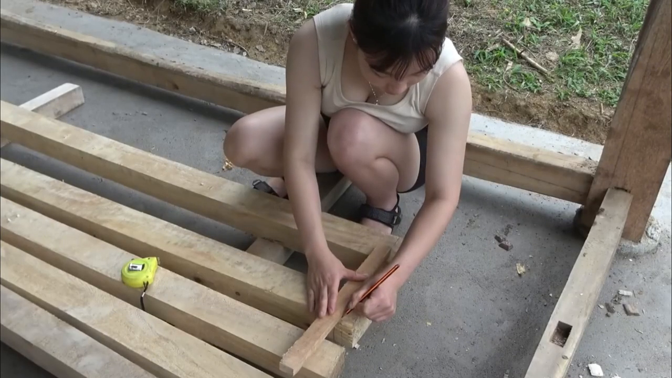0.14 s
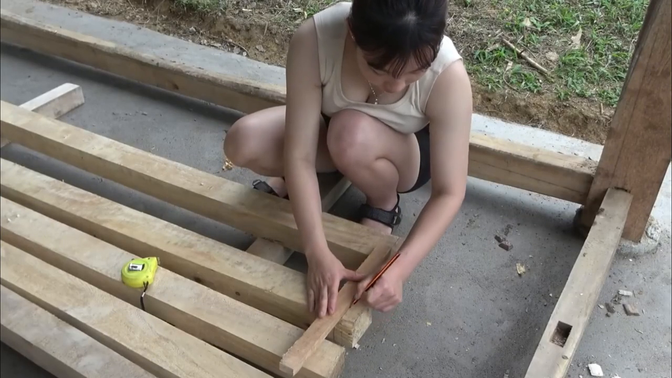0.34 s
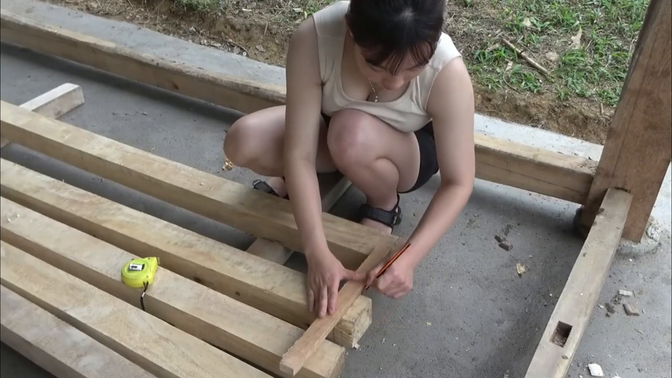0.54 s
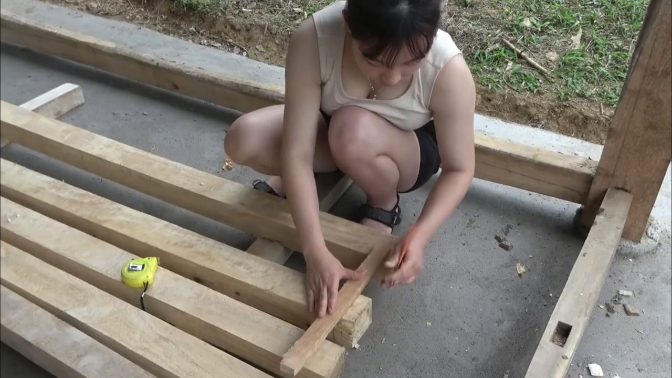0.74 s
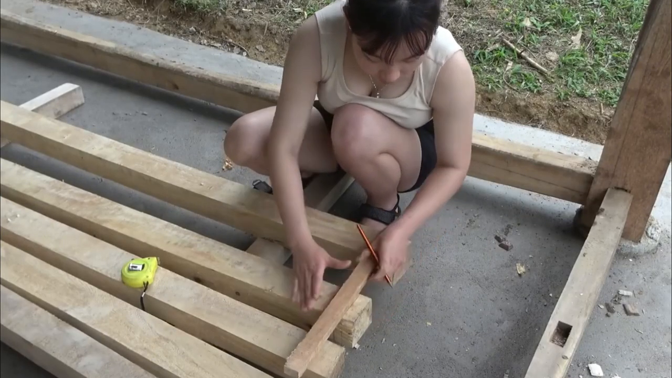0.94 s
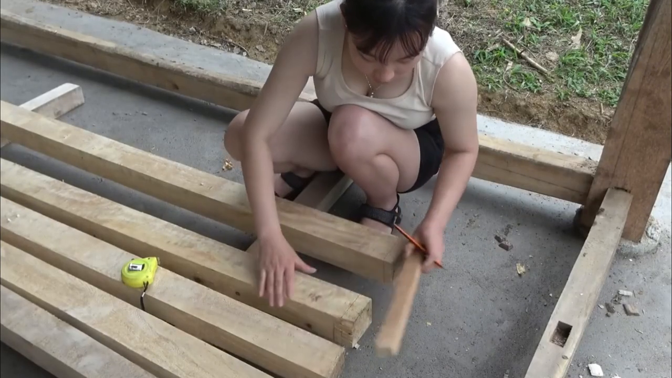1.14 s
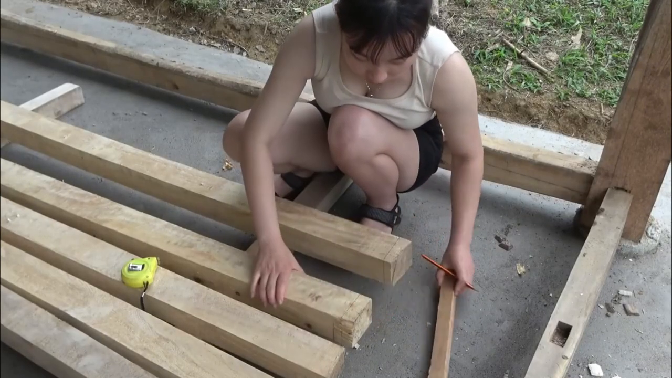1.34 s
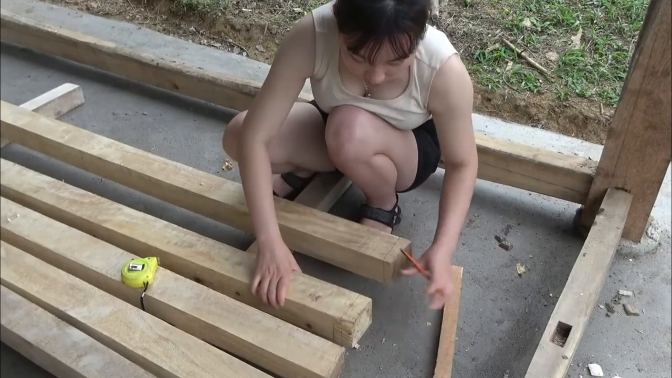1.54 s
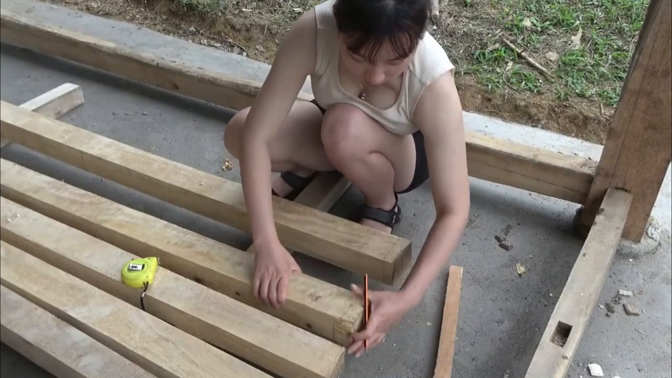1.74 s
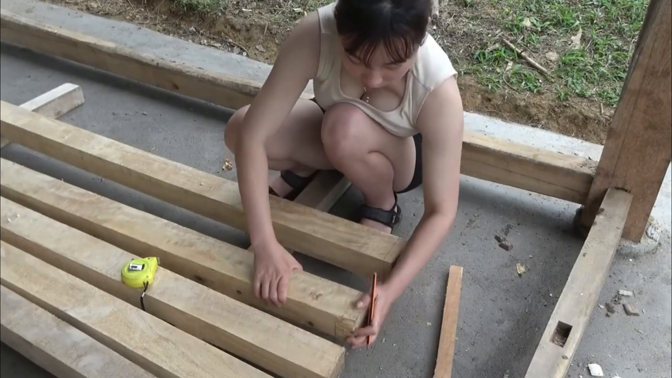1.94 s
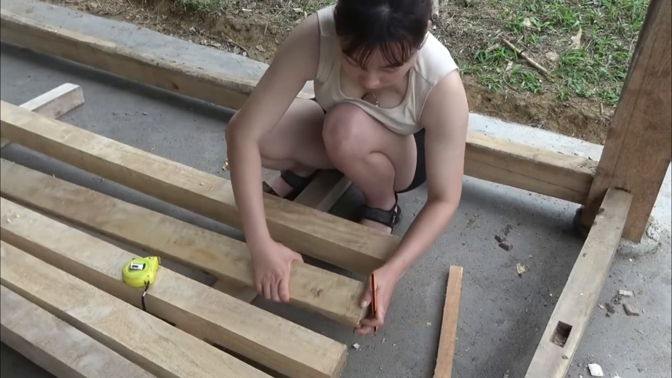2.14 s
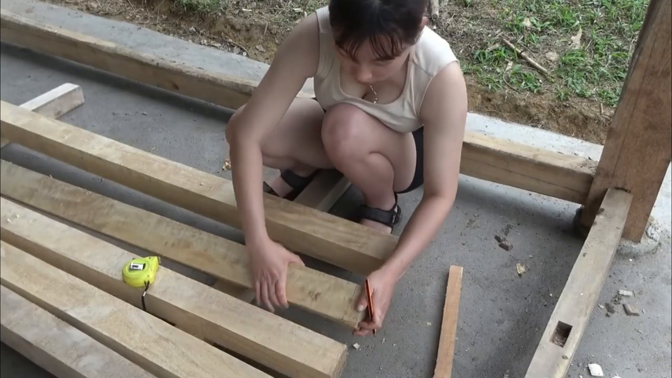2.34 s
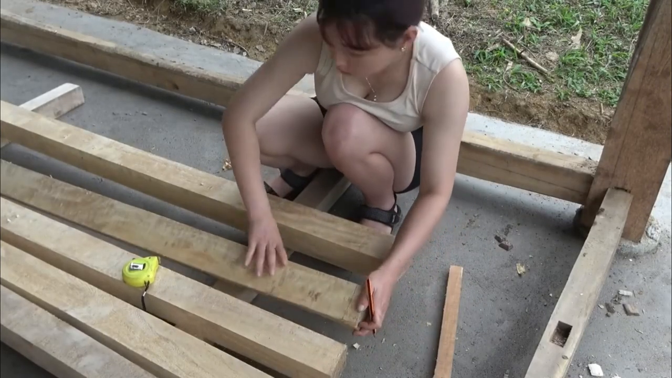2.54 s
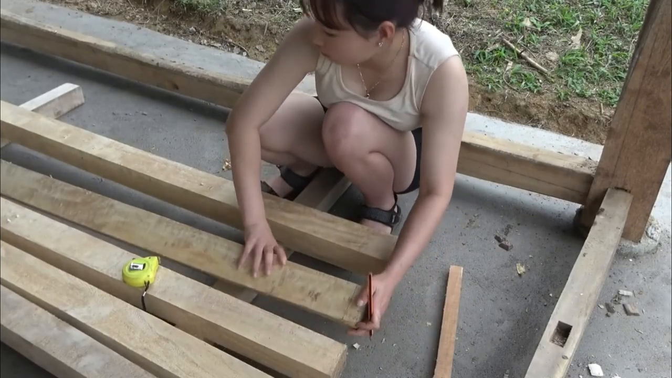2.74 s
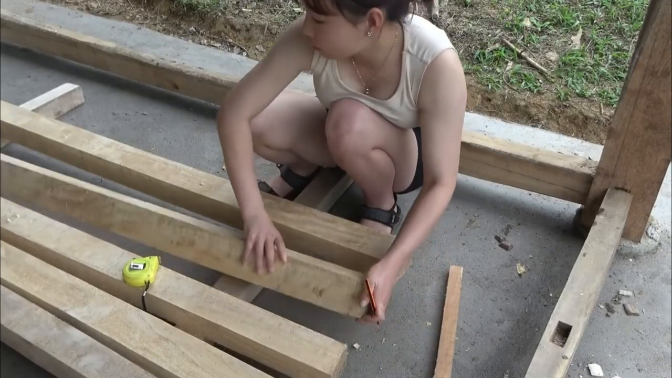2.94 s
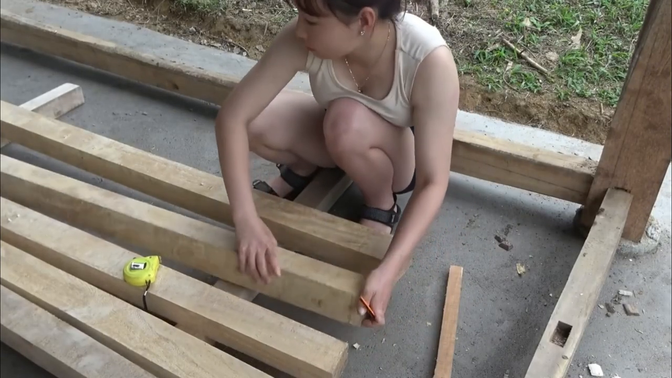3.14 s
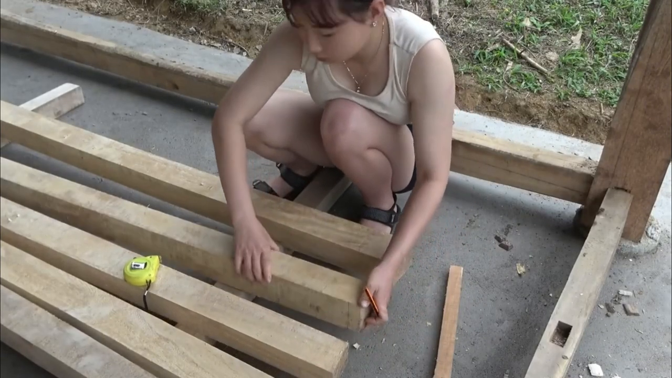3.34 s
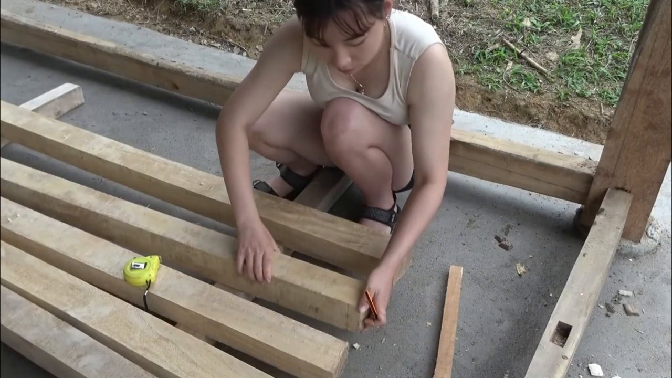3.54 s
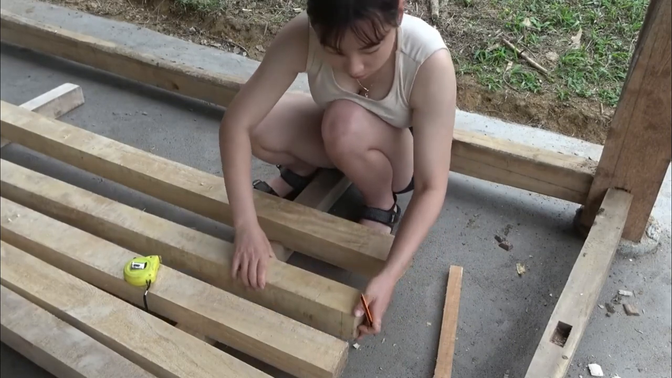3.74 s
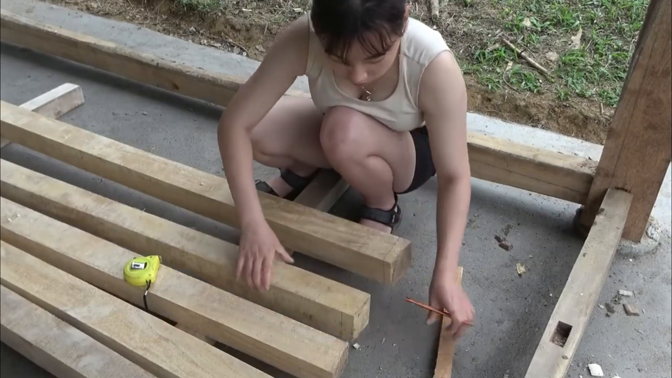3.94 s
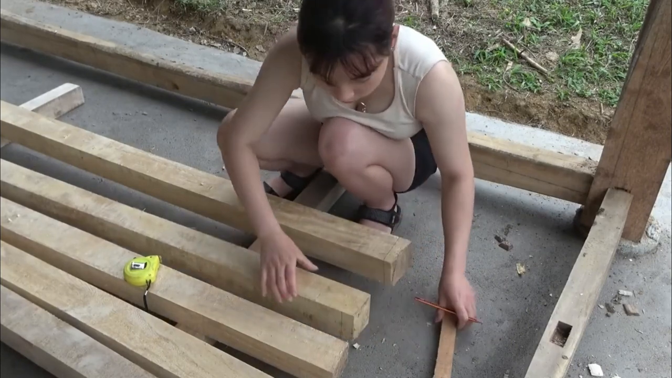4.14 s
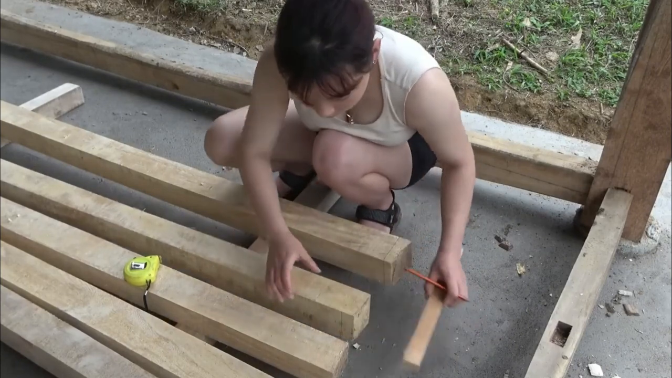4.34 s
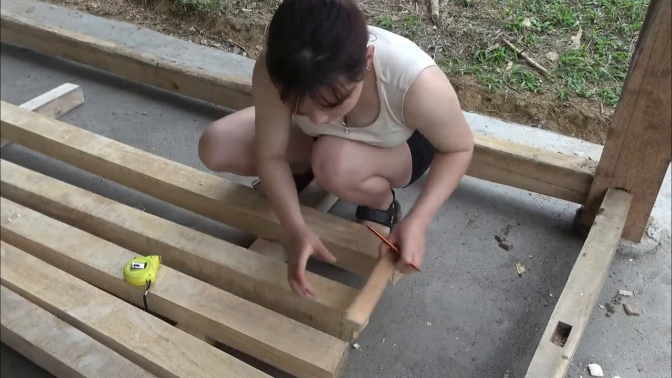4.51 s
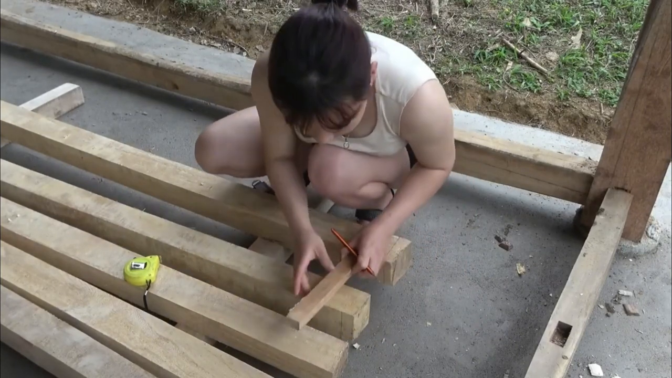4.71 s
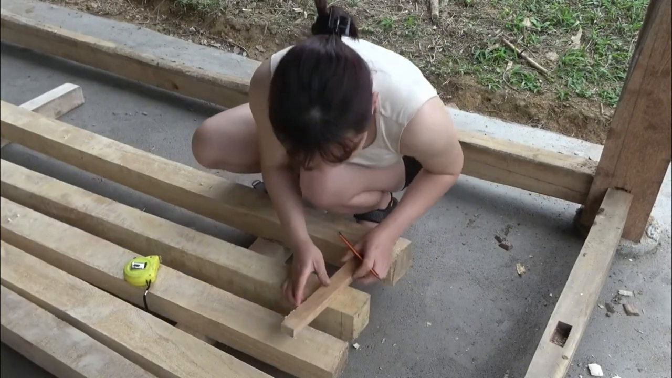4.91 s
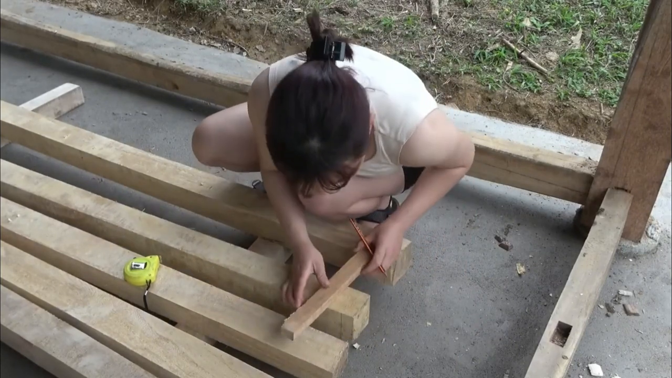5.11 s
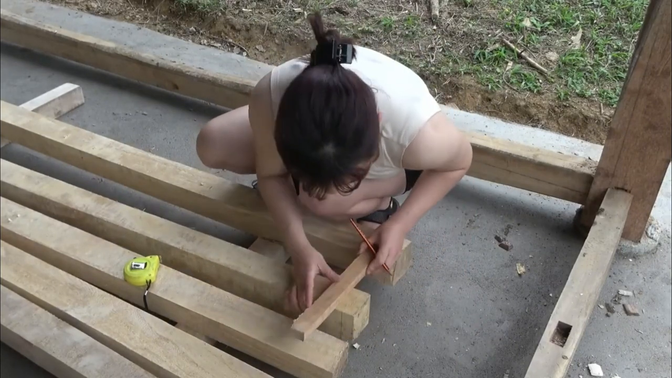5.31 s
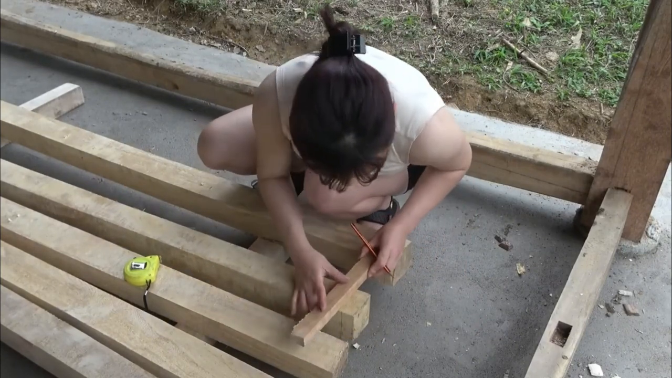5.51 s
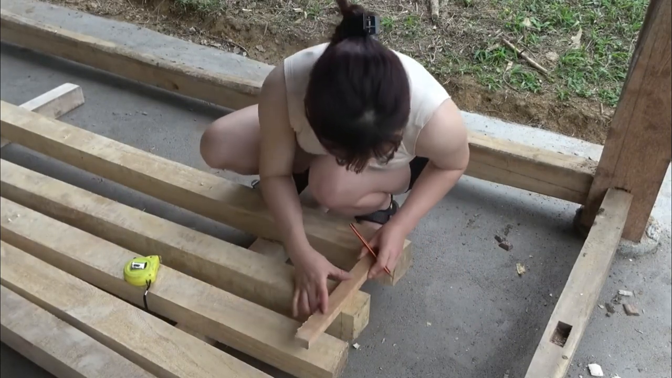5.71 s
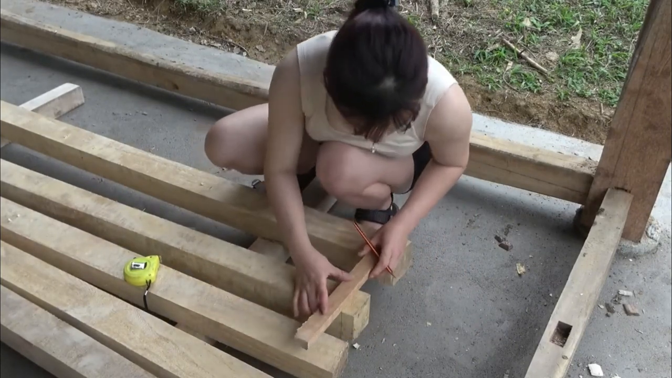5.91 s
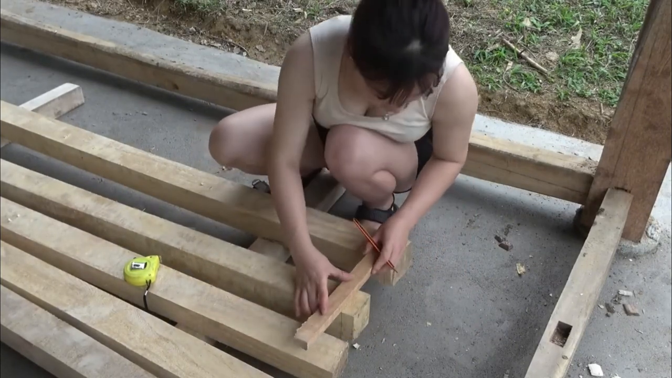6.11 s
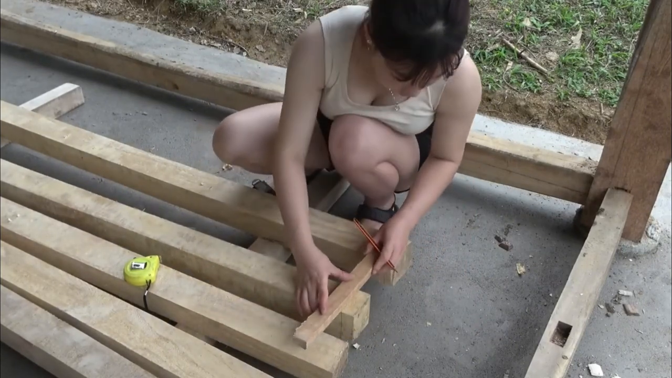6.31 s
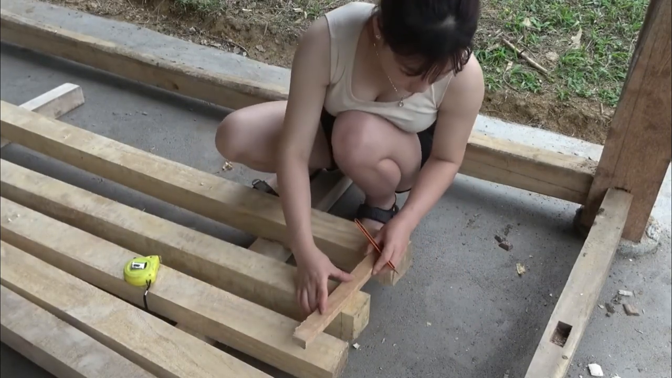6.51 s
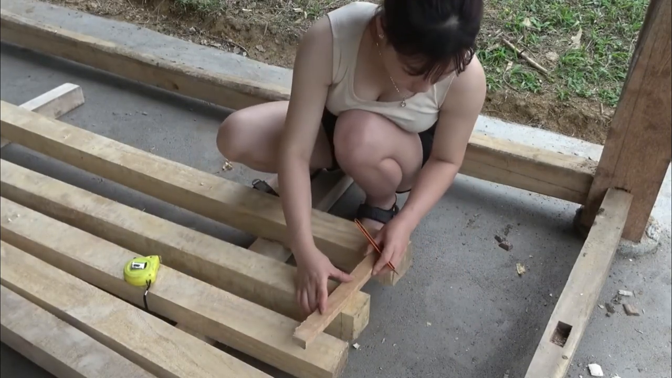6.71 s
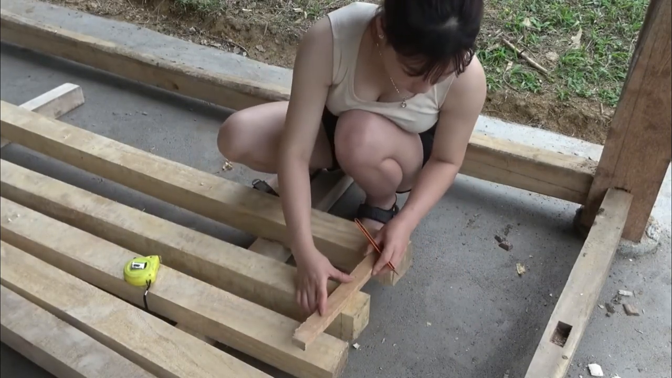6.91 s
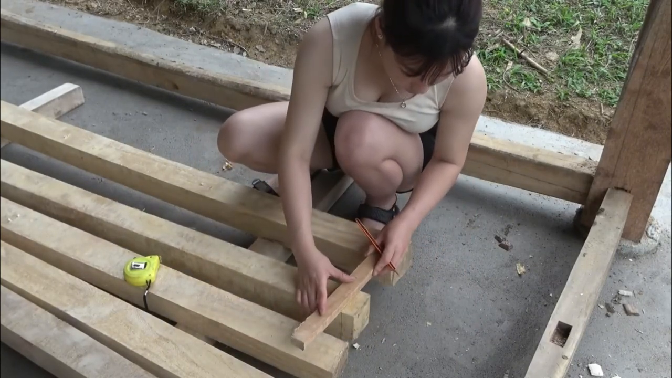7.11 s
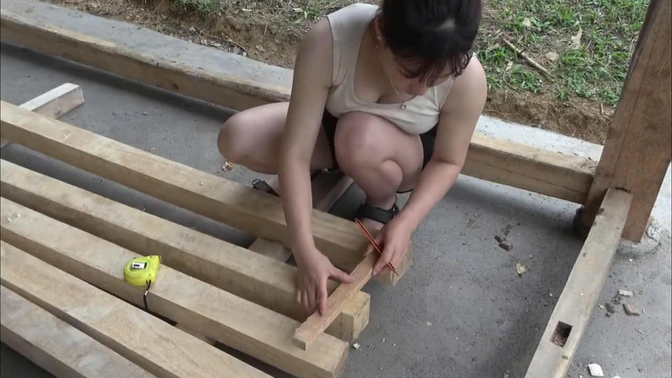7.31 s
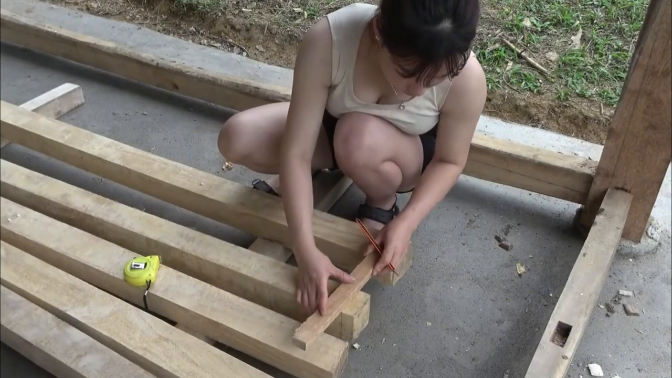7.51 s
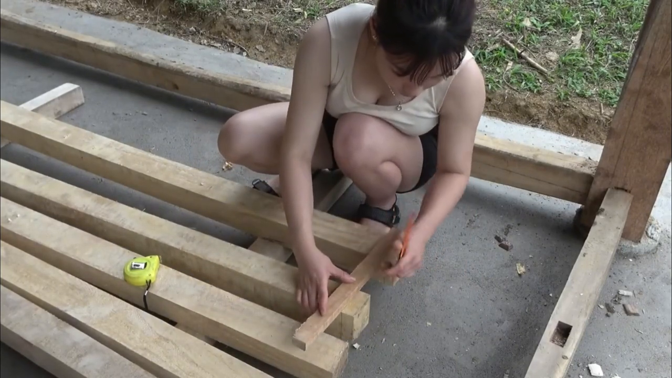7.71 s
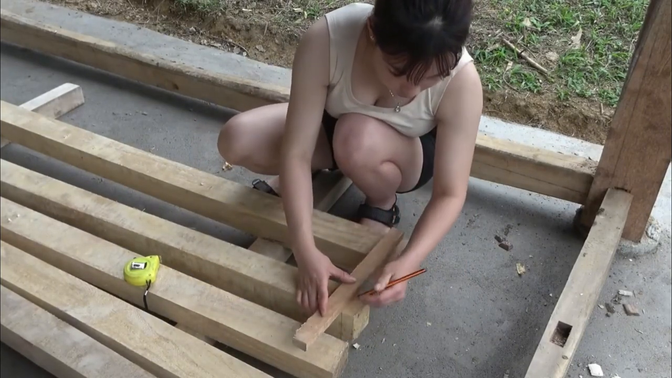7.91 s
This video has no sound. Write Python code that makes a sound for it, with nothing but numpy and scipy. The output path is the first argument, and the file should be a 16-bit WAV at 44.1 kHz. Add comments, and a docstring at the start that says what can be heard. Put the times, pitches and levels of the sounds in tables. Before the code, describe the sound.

A light wooden strip and a heavy beam are shifted and set down with knocks and scrapes, over steady insects and faint birdsong.

```python
"""Timber is shifted on a concrete floor under an open roof: a thin lath is slid off and put down,
a heavy beam is tipped over, dragged and dropped, and the lath is laid back on it.
Blows and stick-slip friction ring the wood's modes; hands brush, grit ticks, sandals scuff
and a pencil clicks. Outside, insects drone in narrow noise bands, one chirps in pulsed trains,
and a far bird repeats a rising note."""
import sys
import numpy as np
from scipy import signal
from scipy.fft import rfft, irfft, next_fast_len
from scipy.io import wavfile

SR = 44100
rng = np.random.default_rng(int(sys.argv[2]) if len(sys.argv) > 2 else 0)


def waveform_to_disk(signal):
    """Save audio, clipped to [-1, 1], as 16-bit WAV at the path in sys.argv[1]."""
    frames = np.transpose(np.atleast_2d(signal))
    scaled = np.clip(frames, -1, 1) * 32767
    samples = np.round(scaled).astype(np.int16)
    wavfile.write(sys.argv[1], SR, samples)


N = 350595
T = np.arange(N) / SR


def amp(db):
    """Decibels to gain."""
    return 10 ** (np.asarray(db) / 20)


def unit(x):
    """Scales to rms 1."""
    return x / np.sqrt(np.mean(x ** 2) + 1e-20)


def read(points, hz):
    """Interpolates a table on a log-frequency axis."""
    f, value = np.transpose(points)
    return np.interp(np.log(hz + 1), np.log(f), value)


def curve(points):
    """Turns a dB spectrum into gain as a function of Hz."""
    return lambda f: amp(read(points, f))


def add(mix, start_s, sound):
    """Mixes a sound in at start_s."""
    part = mix[max(round(start_s * SR), 0):][:len(sound)]
    part += sound[:len(part)]


def colour(x, gain):
    """Filters by a gain that is a function of Hz."""
    size = next_fast_len(len(x))
    return irfft(rfft(x, size) * gain(np.fft.rfftfreq(size, 1 / SR)), size)[:len(x)]


def noise(gain, size=N):
    """Coloured noise, rms 1."""
    return unit(colour(rng.standard_normal(size), gain))


def wander(rate_hz, size=N):
    """Smooth random motion up to rate_hz, rms 1."""
    return noise(lambda f: 1 / (1 + (f / rate_hz) ** 4), size)


def slips(per_s, spread_db):
    """Random stick-slip impulses of uneven size."""
    hits = rng.random(N) < per_s / SR
    return hits * rng.standard_normal(N) * amp(spread_db * np.minimum(rng.exponential(1, N), 4))


def swells(rows, rise_s, decay_s, db_column=2):
    """Event envelopes: linear rise, hold to the row's length, exponential decay."""
    gain = np.zeros(N)
    for row in rows:
        t = T - row[0]
        release = np.exp(-np.maximum(t - row[1], 0) / decay_s)
        gain += amp(row[db_column]) * np.clip(t / rise_s, 0, 1) * release
    return gain


def ring(modes):
    """Impulse response of wood; neighbouring modes swing in opposite senses."""
    t = np.arange(SR) / SR
    return sum((-1) ** k * amp(db - 60 * t / t60) * np.sin(2 * np.pi * hz * t)
               for k, (hz, db, t60) in enumerate(modes))


# stereo width: (frequency [Hz], side gain [dB])
SIDE_GAIN = [(30, -31), (100, -6.5), (300, -3), (1200, -12), (3300, -25.5), (4700, -35), (5800, -0.5),
             (7700, -2.5), (10000, -1), (13000, -5.5)]


def pair(mid, side):
    """Two close microphones: diffuse sound differs between them in the low end and the treble, far less in the
    midrange."""
    side = colour(side, curve(SIDE_GAIN))
    return np.array([mid + side, mid - side])


def diffuse(gain):
    """Noise arriving from all around."""
    return pair(noise(gain), noise(gain))


# reverberation: (frequency [Hz], t60 [s])
ROOF_DECAY = [(100, 1), (400, 0.35), (1200, 0.097), (3000, 0.65), (10000, 0.2)]


def roof(x, build_s=0.0029):
    """Reflections from floor, posts and roof; each band decays at its own rate."""
    hz, t, bands = signal.stft(rng.standard_normal((2, SR)), SR, nperseg=256)
    envelope = amp(-60 * t / read(ROOF_DECAY, hz)[:, None]) * (1 - np.exp(-t / build_s))
    tails = signal.istft(bands * envelope, SR, nperseg=256)[1]
    tails /= np.linalg.norm(tails[0])
    return pair(*signal.fftconvolve(x[None], tails, axes=1)[:, :N])


# open air: (frequency [Hz], relative density [dB])
AIR_SPECTRUM = [(20, -23), (45, 1.5), (90, 2), (200, -1), (400, -4), (800, -5), (1000, -2), (1190, 3),
                (1450, -7), (2200, -10), (3400, -11.5), (5500, -16), (9200, -6.5), (10000, -19),
                (13000, -16.5)]


def air():
    """Open air: broad noise, nearly steady."""
    return amp(-63.5 + 0.5 * wander(rate_hz=7.9)) * diffuse(curve(AIR_SPECTRUM))


# cicada band: (frequency [Hz], relative density [dB])
CICADA_SPECTRUM = [(5500, -6.5), (6600, -2), (7300, 6.5), (8100, 6.5), (8700, -5), (9600, -27)]


def cicadas(pan_db=1.5):
    """Cicadas: a high, flickering band, slightly left."""
    band = diffuse(lambda f: amp(read(CICADA_SPECTRUM, f)) * (f > 5000) * (f < 11000))
    return amp(-64 + 1.3 * wander(rate_hz=24)) * band * amp([[pan_db], [-pan_db]])


# far insect's trains: (start [s], length [s], level [dB])
FAR_CALLS = [(-.2, 0.74, -65.5), (1.0, 0.68, -73), (2.4, 0.61, -74.5), (3.95, 0.76, -77),
             (5.15, 0.44, -70.5), (6.5, 0.55, -75), (7.2, 0.48, -72)]


def far_insects(pitch_hz=4620, farthest_hz=4200, stroke_hz=19.4, chorus_db=-70):
    """Throbbing trains swell over a chorus at the same pitch; the farthest insects sing lower."""
    throb = 1 + 0.22 * np.cos(2 * np.pi * np.cumsum(stroke_hz + wander(rate_hz=3.1)) / SR)
    calling = amp(chorus_db) + swells(FAR_CALLS, rise_s=0.21, decay_s=0.097)
    drone = amp(wander(rate_hz=80)) * diffuse(lambda f: 1 / (1 + ((f - pitch_hz) / 200) ** 2))
    farthest = diffuse(lambda f: 1 / (1 + ((f - farthest_hz) / 320) ** 4))
    return calling * throb * drone + amp(chorus_db - 3 + wander(rate_hz=12.4)) * farthest


# bird notes: (time [s], start pitch [Hz], relative level [dB])
BIRD_NOTES = [(.135, 5140, -60.5), (.545, 4600, -63), (1.524, 4630, -58.5), (1.69, 4770, -58.5),
              (2.04, 4620, -62), (2.845, 4800, -56), (3.56, 4640, -61), (4.395, 4600, -59),
              (4.975, 4840, -60), (5.155, 4660, -60.5), (6.015, 4660, -57.5), (6.9, 4730, -60.5)]


def bird(note_s=0.135, rise_hz=1327, blur_hz=200, core=0.27):
    """Thin upward slurs: a clear core, blurred and echoed on its way through the trees."""
    paths = np.zeros((2, N))
    size = int(note_s * SR)
    slur_hz = rise_hz * np.linspace(0, 1, size) ** 0.9
    envelope = signal.windows.tukey(size, 0.55)
    for start_s, start_hz, db in BIRD_NOTES:
        phase = 2 * np.pi * np.cumsum(start_hz + slur_hz) / SR
        for path, angle in zip(paths, (phase, phase + np.pi / 2)):
            note = np.sin(angle) * (core + wander(blur_hz, size))
            note += np.cos(angle) * wander(blur_hz, size)
            add(path, start_s, amp(db - 4) * unit(note) * envelope)
    return pair(*paths) + amp(-5) * roof(paths[0])


# near insect's trains: (first pulse [s], last pulse [s], relative level [dB])
CHIRP_TRAINS = [(0.328, 0.825, -60.5), (2.011, 2.417, -60.5), (3.56, 4.023, -61), (4.689, 5.203, -60),
                (6.175, 6.635, -60.5), (7.523, 7.981, -60)]


def near_insect(pitch_hz=4370, flat_hz=230, warm_s=0.15, pulse_s=0.041, spacing_s=0.051, rasp_hz=260):
    """Pulse trains start soft and flat, then rise to pitch; uneven strokes add a rasp."""
    gate, hz = np.zeros(N), np.full(N, float(pitch_hz))
    pulse = signal.windows.tukey(int(pulse_s * SR), 0.35)
    age_s = np.maximum(np.arange(SR) / SR - 0.1, 0)
    for first_s, last_s, db in CHIRP_TRAINS:
        add(gate, first_s - 0.08, amp(db - 11) * pulse)  # faint lead-in stroke
        for start_s in np.linspace(first_s, last_s, round((last_s - first_s) / spacing_s) + 1):
            add(gate, start_s, amp(db - 6.6 * np.exp(-(start_s - first_s) / 0.066)) * pulse)
        add(hz, first_s - 0.1, -flat_hz * np.exp(-(age_s / warm_s) ** 2))
    phase = 2 * np.pi * np.cumsum(hz + 45 * wander(rate_hz=129)) / SR
    tone = np.sin(phase) * (1 + 0.07 * wander(rate_hz=340))
    rasp_phase = phase - 2 * np.pi * 90 * T  # 90 Hz under the tone
    rasp, scattered = (np.sin(rasp_phase) * wander(rasp_hz) + np.cos(rasp_phase) * wander(rasp_hz)
                       for _ in range(2))
    direct = unit(tone + 0.45 * rasp)
    side = 0.5 * np.cos(phase) + 0.079 * scattered  # left and right are out of step
    return gate * np.array([1.33 * direct + side, 2.48 * direct - side])


# rough wood faces, crushed grit: (frequency [Hz], relative level [dB])
ROUGH_SPECTRUM = [(40, -24), (90, -28), (155, 3), (260, -7.5), (350, -1), (550, -3.5), (1300, -2),
                  (2000, -6.5), (3000, -11), (5000, -15.5), (13000, -26)]
GRIT_SPECTRUM = [(300, -24), (1200, -2.5), (2500, -0.5), (4000, -0.5), (7000, 0), (11000, 0), (14000, -3.5)]


def slide(strokes, modes, rasp_gain, rise_s, decay_s):
    """Juddering slips ring the wood, rasp its faces and crush fine grit."""
    judder = amp(-wander(rate_hz=35))
    drive = slips(per_s=3200, spread_db=0.7) * judder
    body = unit(signal.oaconvolve(drive, ring(modes))[:N])
    rasp = unit(colour(drive, curve(ROUGH_SPECTRUM)))
    grains = slips(per_s=3500, spread_db=1.8) * judder
    grit = unit(colour(grains, curve(GRIT_SPECTRUM)))
    wood = swells(strokes, rise_s, decay_s) * unit(body + rasp_gain * rasp)
    return wood + swells(strokes, rise_s, decay_s, db_column=3) * grit


# rubbed lath: (frequency [Hz], relative level [dB], t60 [s])
LATH_RUB_MODES = [(657.4, 7.5, 0.42), (1034, 12, 0.041), (1113, 14, 0.061), (1372, 0, 0.1),
                  (2040, 1, 0.073)]
# strokes: (start [s], length [s], wood level [dB], grit level [dB])
LATH_STROKES = [(.35, .1, -64, -69), (.445, 0.079, -56, -70), (.555, 0.064, -64, -65),
                (.65, 0.028, -52, -58), (1.09, 0.04, -64, -79), (1.43, 0.22, -70, -68),
                (4.36, 0.13, -77, -69), (5.06, 0.099, -76, -69), (6.04, 0.059, -88, -65.5)]


def lath_rubs():
    """The lath is drawn over wood or floor and rings with the friction."""
    return slide(LATH_STROKES, LATH_RUB_MODES, rasp_gain=0.41, rise_s=0.021, decay_s=0.039)


def knocks(blows, modes, thud_modes, rattle_t60_s, highpass_hz):
    """Each blow rings, thuds (wood damped on its support) and rattles; soft contacts lose treble."""
    out, t = np.zeros(N), np.arange(SR) / SR
    body, thud = ring(modes), ring(thud_modes)
    for start_s, ring_db, thud_db, lowpass_hz, rattle_db in blows:
        rattle = noise(curve(ROUGH_SPECTRUM), SR) * amp(-60 * t / rattle_t60_s)
        blow = amp(ring_db) * body + amp(thud_db) * thud + amp(rattle_db) * rattle
        add(out, start_s, signal.lfilter(*signal.butter(2, lowpass_hz, fs=SR), blow))
    # high-pass keeps the knocks free of low thump
    return signal.lfilter(*signal.butter(2, highpass_hz, "high", fs=SR), out)


# lath across the beams, ring and thud: (frequency [Hz], relative level [dB], t60 [s])
STACK_MODES = [(159.5, -24.5, 0.52), (458, -47, .15), (530, -5, 0.13), (552, 5.5, 0.07), (674, -12.5, 0.21),
               (730, -7.5, 0.15), (746, -17, 0.19), (971, -12.5, 0.33), (1087, -2, 0.1), (1209, -7.5, 0.2),
               (1382, -11.5, 0.69), (1450, -18.5, 0.069), (1916, -11, 0.092), (2046, -19, 0.079),
               (2570, -4, 0.1)]
STACK_THUD_MODES = [(529, 0.47, 0.11), (1370, -1.8, 0.0064)]
# blows: (time [s], ring gain [dB], thud gain [dB], low-pass [Hz], rattle gain [dB])
STACK_BLOWS = [(.679, -61, -85, 4020, -51), (4.9585, -44, -39, 2800, -43), (4.9638, -30.5, -31, 1530, -53),
               (4.9815, -35, -36, 1440, -42.5), (5.009, -69, -40.5, 2800, -57)]


def lath_on_beams():
    """The lath strikes the beams and rings lying across them."""
    return knocks(STACK_BLOWS, STACK_MODES, STACK_THUD_MODES, rattle_t60_s=0.13, highpass_hz=256)


# pencil and grit contacts: (time [s], relative level [dB], t60 [s])
TICK_BURSTS = [(0.682, -54, 0.051), (2.095, -54, 0.11), (2.144, -50, 0.16), (2.166, -50, 0.22),
               (2.845, -62, 0.067), (3.122, -53, 0.16), (3.914, -55.5, 0.093), (4.3568, -34, 0.0059),
               (4.358, -51, 0.11), (4.452, -50.5, 0.057), (5.106, -53.5, 0.047), (5.916, -59, .05),
               (6.08, -58, 0.044)]


def ticks():
    """Tiny hard contacts: bright, fast-decaying noise bursts."""
    out, t = np.zeros(N), np.arange(SR // 4) / SR
    for start_s, db, t60 in TICK_BURSTS:
        add(out, start_s, noise(curve(GRIT_SPECTRUM), len(t)) * amp(db + 0.5 - 60 * t / t60))
    return out


# strokes: (start [s], length [s], level [dB])
BRUSH_STROKES = [(1.022, 0.12, -64), (1.743, 0.1, -61.5), (2.93, 0.078, -53.5), (3.65, 0.25, -64),
                 (4.32, 0.11, -60.5), (4.378, 0.16, -59), (5.896, 0.076, -67.5), (6.058, 0.047, -63)]
# brushing: (frequency [Hz], relative level [dB])
BRUSH_SPECTRUM = [(300, -5), (900, -5), (2200, 2), (3800, -0.5), (6000, -3), (13000, -14)]


def brushes():
    """Hands and lath brush dry wood and floor: light strokes of fine slips."""
    envelope = np.zeros(N)
    for start_s, length_s, db in BRUSH_STROKES:
        add(envelope, start_s, amp(db) * signal.windows.tukey(int(length_s * SR), 0.8))
    return envelope * unit(colour(slips(per_s=2500, spread_db=1), curve(BRUSH_SPECTRUM)))


# lath on concrete, ring and thud: (frequency [Hz], relative level [dB], t60 [s])
LATH_MODES = [(534.8, 1.5, 0.19), (1050, -10, 0.038), (1410, -1.5, 0.12), (1790, -33, .09), (1970, -17, .1),
              (2480, -5, 0.14), (2670, 5, 0.025), (3000, -14, .07), (4030, 3.5, 0.028)]
LATH_THUD_MODES = [(1040, 0.52, 0.017), (2010, 0.18, 0.0091)]
# blows: (time [s], ring gain [dB], thud gain [dB], low-pass [Hz], rattle gain [dB])
LATH_BLOWS = [(1.4255, -44, -29.5, 3980, -37.5), (1.477, -52, -66, 9000, -61),
              (1.523, -52.5, -59, 3500, -55), (1.6175, -45.5, -35.5, 1550, -42.5),
              (1.637, -80, -57, 6000, -57)]


def lath_on_floor():
    """The lath strikes the concrete and rings briefly."""
    return knocks(LATH_BLOWS, LATH_MODES, LATH_THUD_MODES, rattle_t60_s=0.11, highpass_hz=138)


# foot shifts: (start [s], length [s], rumble level [dB], scuff level [dB])
FOOT_SHIFTS = [(1.47, .1, -67, -81), (2.15, .25, -75, -84), (3.0, 0.59, -73, -77), (3.3, 0.077, -62, -61),
               (5.6, 0.17, -63, -64.5)]
# soles: (frequency [Hz], relative level [dB])
SCUFF_SPECTRUM = [(60, -27), (140, -12), (280, 7.5), (500, 2), (1000, 0), (3000, -17), (13000, -35)]


def sandals(rise_s=0.04, decay_s=0.082, rumble_hz=50):
    """Shifting weight rumbles in the floor while the soles scuff."""
    floor = diffuse(lambda f: 1 / (1 + 3 * np.log2((f + 1) / rumble_hz) ** 4))
    soles = unit(colour(slips(per_s=900, spread_db=0), curve(SCUFF_SPECTRUM)))
    rumble = swells(FOOT_SHIFTS, rise_s, decay_s) * floor
    return rumble + swells(FOOT_SHIFTS, rise_s, decay_s, db_column=3) * soles


# dragged beam: (frequency [Hz], relative level [dB], t60 [s])
BEAM_DRAG_MODES = [(165.4, -12, 0.26), (270, -13.5, 0.32), (399, -3, 0.11), (455, -8.5, 0.13),
                   (518, 0, 0.074), (640, 0.5, 0.27), (707, -1.5, 0.13), (801, -0.5, 0.055),
                   (1005, -4.5, 0.28), (1074, -3.5, 0.29), (1163, 0, 0.12), (1348, -0.5, 0.14),
                   (1488, -17, 0.11)]
# pushes: (start [s], length [s], wood level [dB], grit level [dB])
BEAM_PUSHES = [(2.1, 0.06, -56, -57.5), (2.2, 0.15, -53, -74), (2.78, 0.061, -62.5, -66),
               (2.975, 0.17, -46.5, -61.5), (3.16, 0.28, -52.5, -80), (3.72, 0.095, -56, -77)]


def beam_drags():
    """The beam groans as it is pushed over its support."""
    return slide(BEAM_PUSHES, BEAM_DRAG_MODES, rasp_gain=0.6, rise_s=0.022, decay_s=0.037)


# beam, free ring and thud: (frequency [Hz], relative level [dB], t60 [s])
BEAM_MODES = [(150, -23, 0.35), (181.4, -20, 0.32), (210, -22, 0.28), (241, -26, 0.22),
              (287.5, -18.5, 0.55), (384, -25, .25), (441, -5.5, .32), (464, -6, .24), (510, -3, .21),
              (541, -2, .19), (636, -1.5, .21), (665, -8, .13), (760, -9.5, 0.25), (808, -7.5, 0.19),
              (976, -11, 0.21), (1076, -12, 0.15), (1150, -10, .12), (1190, -8, 0.2), (1333, -8.5, 0.15),
              (1444, -19, 0.12), (1522, -14, .17), (1640, -25, 0.11), (1990, -16, .17), (2220, -20, 0.14)]
BEAM_THUD_MODES = [(644, -3.5, 0.06), (1140, -11, 0.029)]
# blows: (time [s], ring gain [dB], thud gain [dB], low-pass [Hz], rattle gain [dB])
BEAM_BLOWS = [(2.1572, -29, -31, 2480, -37), (2.1632, -42, -33, 1490, -39), (2.1815, -43, -32, 1350, -32),
              (2.1975, -36, -24.5, 1130, -36.5), (2.2445, -51, -37, 600, -38.5),
              (2.307, -74, -66, 1500, -52), (2.987, -67, -58, 1500, -48.5), (3.1705, -49, -36, 1500, -44),
              (3.1745, -39.5, -24.5, 890, -39), (3.3295, -54, -27.5, 1600, -40),
              (3.3342, -30, -15, 1050, -39), (3.3425, -41.5, -32, 1100, -32.5), (3.405, -53, -56, 700, -42),
              (3.5105, -56, -40.5, 970, -67), (4.964, -43.5, -55, 1570, -68)]


def beam_knocks():
    """The heavy beam tips and drops; clustered blows ring its modes."""
    return knocks(BEAM_BLOWS, BEAM_MODES, BEAM_THUD_MODES, rattle_t60_s=0.17, highpass_hz=140)


# pencil click: (frequency [Hz], relative level [dB], t60 [s])
PENCIL_MODES = [(1176, -8.5, 0.056), (2270, 0, .018), (6500, -2, .006), (10100, 11, 0.0047)]


def pencil(start_s=4.3565, gain_db=-44):
    """The pencil hits the lath: one dry click with a very short ring."""
    out = np.zeros(N)
    add(out, start_s, amp(gain_db) * ring(PENCIL_MODES))
    return out


# side reflection: (frequency [Hz], gain [dB])
ECHO_GAIN = [(150, -35), (600, -11), (1100, -40), (2500, -12), (6000, -8), (12000, -6)]


def side_echo(x, delay_s=0.00392):
    """One early, filtered reflection from the side."""
    return colour(np.roll(x, round(delay_s * SR)), curve(ECHO_GAIN))


def scene():
    """Wood close by under the roof; insects and bird beyond it."""
    wood = lath_rubs() + lath_on_beams() + ticks() + brushes() + lath_on_floor()
    wood += beam_drags() + beam_knocks() + pencil()
    direct = pair(wood, side_echo(wood)) * amp([[-0.7], [0.7]])  # slightly right
    near = direct + amp(-12.5) * roof(wood) + sandals()
    chirps = near_insect()
    outside = air() + cicadas() + far_insects() + bird() + chirps
    return near + outside + amp(-11.5) * roof(chirps.mean(0))


def record(dry, cutoff_hz=13100):
    """Steep low-pass band limit."""
    lowpass = signal.firwin(511, cutoff_hz, window=("kaiser", 8), fs=SR)
    return signal.oaconvolve(dry, lowpass[None], "same")


dry = scene()
out = record(dry)
waveform_to_disk(out)
```